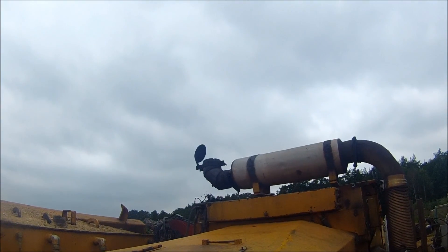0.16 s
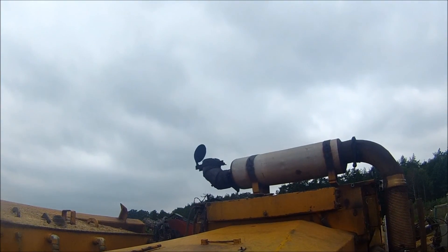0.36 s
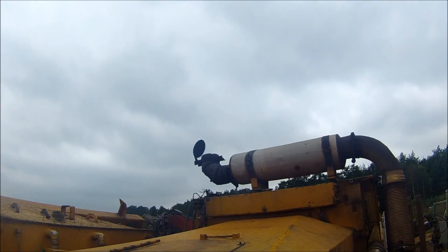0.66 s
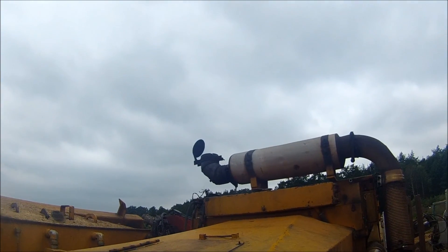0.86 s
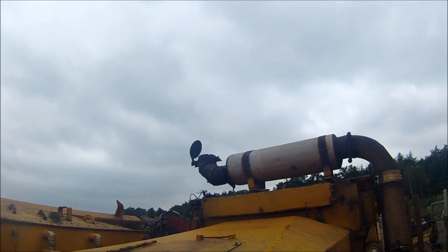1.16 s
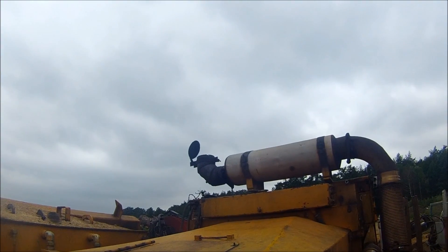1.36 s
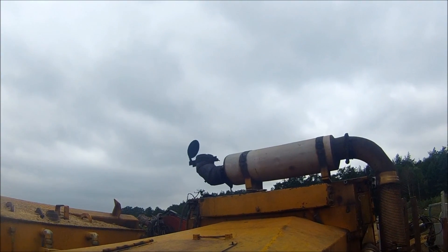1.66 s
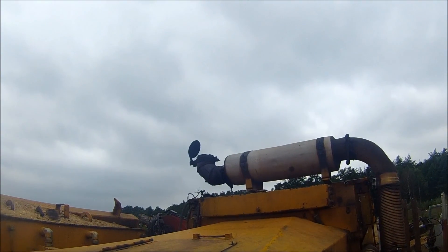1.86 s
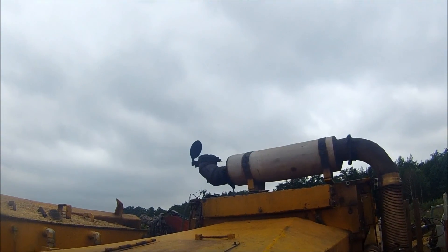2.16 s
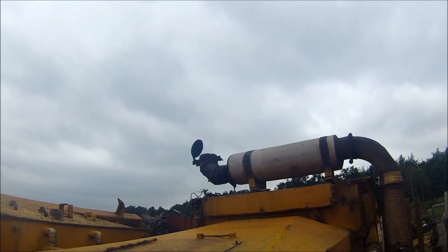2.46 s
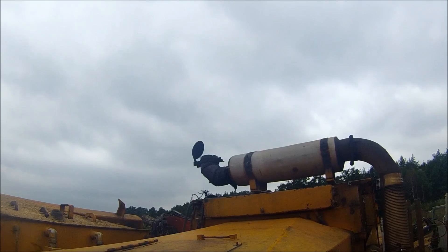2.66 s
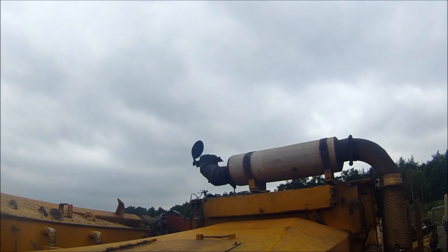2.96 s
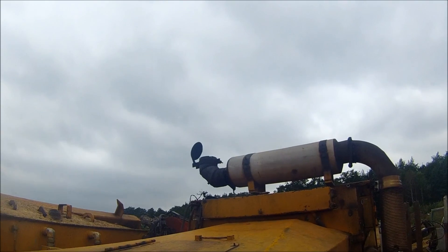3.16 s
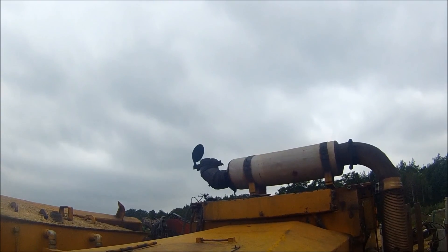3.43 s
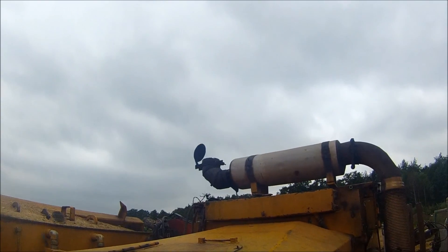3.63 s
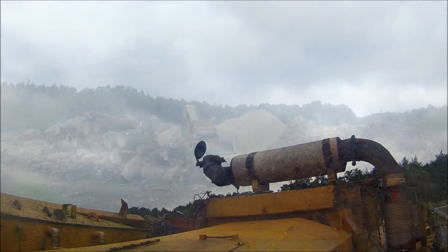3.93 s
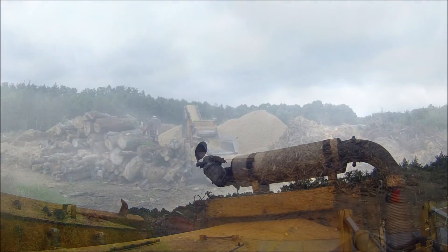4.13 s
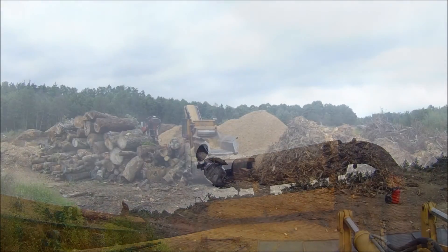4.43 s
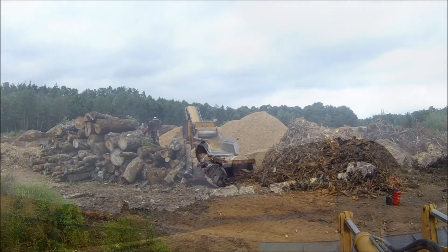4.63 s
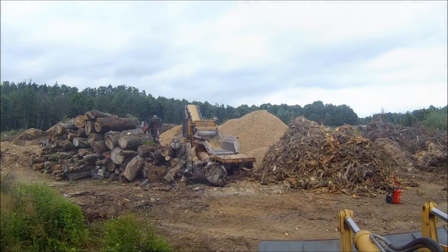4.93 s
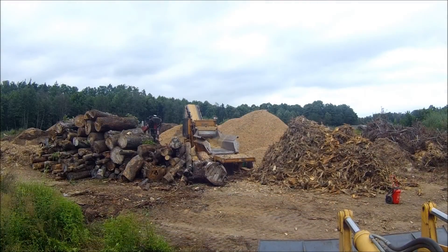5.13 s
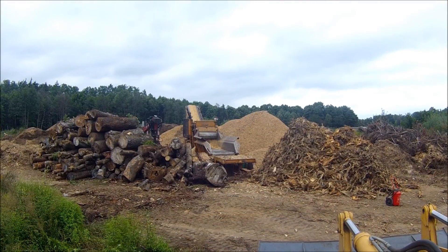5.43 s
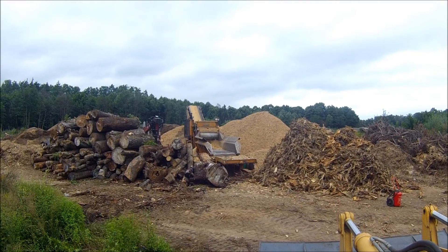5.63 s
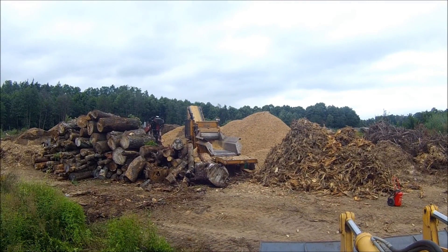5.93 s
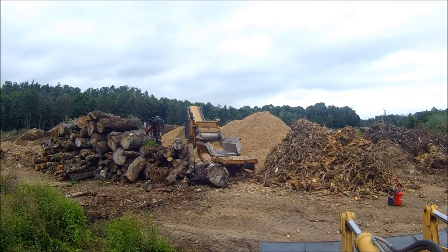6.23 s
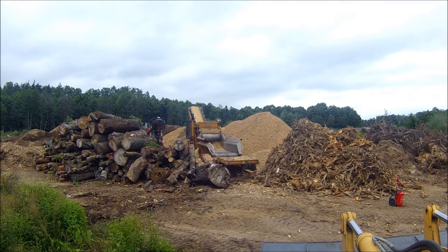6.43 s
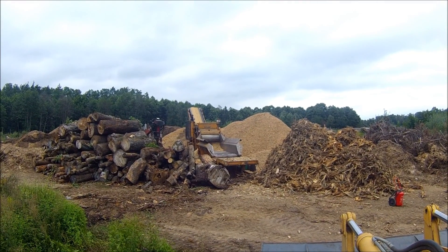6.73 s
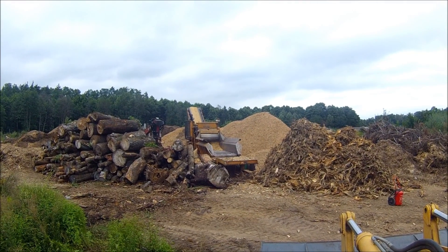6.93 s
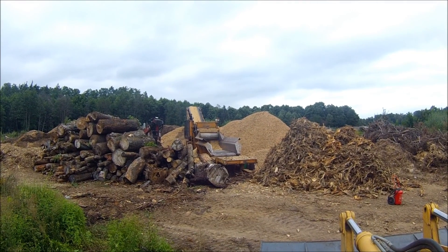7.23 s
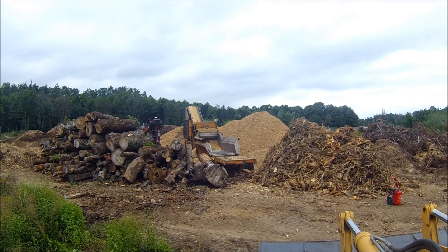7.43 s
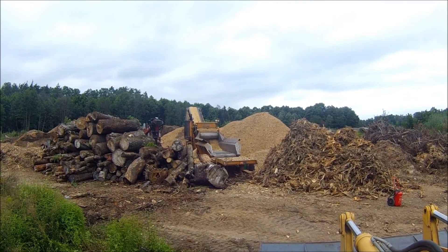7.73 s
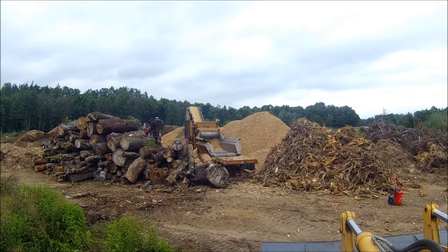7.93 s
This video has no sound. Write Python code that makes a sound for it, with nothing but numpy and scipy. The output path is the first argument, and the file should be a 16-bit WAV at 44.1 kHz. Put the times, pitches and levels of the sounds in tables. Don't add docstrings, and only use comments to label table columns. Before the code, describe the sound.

Up close, a big diesel roars boxily; after a thud it drops away to a far-off grinder sagging under load, with chip rattle and sharp rapid knocks.

```python
import sys
import numpy as np
from scipy import signal
from scipy.io import wavfile
from scipy.ndimage import uniform_filter1d

SR = 44100
rng = np.random.default_rng(int(sys.argv[2]) if len(sys.argv) > 2 else 0)


def boost_factor(decibels):
    exponent = np.asarray(decibels, float) / 20
    return 10 ** exponent


def bounce(signal):
    frames = np.transpose(np.atleast_2d(signal))
    limited = np.clip(frames, -1, 1)
    pcm = np.round(limited * 32767).astype(np.int16)
    wavfile.write(sys.argv[1], SR, pcm)


N = 356769


def seconds():
    return np.arange(N) / SR


def curve(rows):
    times, values = np.transpose(rows)
    return np.interp(seconds(), times, values)


def evened(x):
    return x / np.sqrt(np.mean(x ** 2) + 1e-20)


def wander(rate_hz, step):
    f = np.geomspace(rate_hz / 10, rate_hz, 16)[:, None]
    t = np.arange(0, N + 256, 256) / SR
    sines = np.sin(2 * np.pi * (f * t + rng.random(f.shape))) / np.sqrt(f)
    return np.interp(np.arange(0, N, step) / SR, t, evened(sines.sum(0)))


def drift(rate_hz):
    return wander(rate_hz, step=1)


def band(x, lo_hz, hi_hz):
    return signal.sosfilt(signal.butter(3, [lo_hz, hi_hz], "band", fs=SR, output="sos"), x)


def through(x, air, case, leak_db):
    hz = np.abs(np.fft.fftfreq(8192, 1 / SR)) + 1
    power = boost_factor(leak_db) ** 2
    for centre, width, db in case:
        power = power + boost_factor(db) ** 2 / (1 + (2 * (hz - centre) / width) ** 2) ** 2
    air_hz, air_db = np.transpose(air)
    air_gain = boost_factor(np.interp(np.log(hz), np.log(air_hz), air_db))
    log_gain = np.log(power) / 2 + np.log(air_gain)
    taps = np.fft.ifft(np.exp(np.conj(signal.hilbert(log_gain)))).real[:4096]
    return signal.oaconvolve(x, taps / np.linalg.norm(taps))[:len(x)]


def turbulence(patchy_db, tilt_db):
    frames, hz = N // 128 + 5, np.fft.rfftfreq(512, 1 / SR)
    real, imag, patches = rng.standard_normal((frames, 257, 3)).T
    patches = uniform_filter1d(patches, size=8, axis=0)
    patches = evened(uniform_filter1d(patches, size=20, axis=1))
    tilt = np.interp(np.arange(frames) * 128, np.arange(N), tilt_db)
    slope = np.outer(hz / 6600.0, tilt)
    spectrum = (real + 1j * imag) * boost_factor(patchy_db * patches + slope)
    return evened(signal.istft(spectrum, nperseg=512, noverlap=384)[1][:N])


def orders(turns, table, unsteady_db):
    low = 0
    for multiple, db in table:
        level = boost_factor(db + unsteady_db * wander(5, step=8))
        low = low + level * np.sin(2 * np.pi * (multiple * turns[::8] + rng.random()))
    return np.sqrt(2) * signal.resample_poly(low, 8, 1)[:N]


# (time [s], full firing cycles [Hz])
NEAR_SPEED = [
    (0, 16.25),
    (1.25, 16.3),
    (1.7, 15.9),
    (2.5, 15.9),
    (2.8, 16.1),
    (3.3, 16.0),
    (3.7, 15.65),
    (4.6, 15.5),
    (5.1, 15.3),
]


def near_crank():
    speed_hz = curve(NEAR_SPEED)
    return np.cumsum(speed_hz) / SR, speed_hz


# (time [s], level [dB])
ROAR = [(0, -18), (.6, -16), (1, -17.5), (1.6, -16.5), (2.3, -17.5), (2.7, -16), (3.5, -17.5), (4.1, -16.5),
        (4.6, -18), (5.1, -17.5)]
# (frequency [Hz], level [dB])
ROAR_AIR = [(20, -18), (80, -7), (250, -5), (350, -8.5), (800, -7.5), (1800, -17.5), (5000, -11.5),
            (7000, -23.5), (15000, -36)]
# (frequency [Hz], width [Hz], level [dB])
NEAR_CASE = [(755, 100, -15.5), (904, 47, -7.5), (1024, 85, -6.5), (1134, 182, 0), (1446, 184, 5.5),
             (2175, 168, 10), (2427, 347, 11.5), (2690, 280, 2.5), (3023, 360, 1), (3605, 470, -0.5),
             (4028, 384, 6), (4350, 250, 2), (4617, 307, 4.5), (4920, 160, -3), (5250, 380, -8),
             (5910, 270, -10.5), (6570, 210, -6), (6790, 170, -5.5), (8080, 1020, -5), (9400, 620, -9),
             (10360, 940, -12), (12600, 900, -10)]


def exhaust_roar(cycle):
    effort_db = curve(ROAR)
    gate_db = 0.2 * np.sin(cycle) + 0.47 * np.sin(2 * cycle + 1) + 0.5 * np.sin(3 * cycle + 2)
    gate_db = gate_db + 0.52 * drift(60)
    tilt_db = 0.59 * (-16.5 - effort_db)
    gusts = turbulence(patchy_db=0.35, tilt_db=tilt_db) * boost_factor(gate_db)
    return evened(through(gusts, ROAR_AIR, NEAR_CASE, leak_db=-13.5)) * boost_factor(effort_db - 0.08)


# (multiple of the cycle [1], level [dB rms])
NEAR_ORDERS = [(1, -56), (2, -48), (2.5, -53), (3, -45), (4, -45), (5, -52), (6, -44), (7, -54), (8, -43),
               (9, -44), (10, -42), (11, -52), (12, -47), (12.5, -54), (13, -45), (13.5, -51), (14, -41),
               (14.5, -55), (15, -44), (16, -48), (17, -53), (18, -56), (19, -54), (21, -53)]


def crank_orders(turns):
    return boost_factor(1) * orders(turns, NEAR_ORDERS, unsteady_db=1.3)


# (multiple of the cycle [1], level [dB rms])
GEAR_ORDERS = [(33, -58), (36, -51), (39, -53), (42, -56), (45, -52), (48, -48), (54, -52), (55, -51),
               (56, -48), (57, -50), (70, -49), (90, -46)]


def gear_orders(turns):
    return boost_factor(-1) * orders(turns, GEAR_ORDERS, unsteady_db=2.5)


# (time [s], level [dB])
TURBO = [(0, -44.5), (.5, -38.5), (1, -45.5), (1.9, -54), (2.2, -45), (2.5, -43), (2.8, -39), (3.55, -51),
         (3.72, -41), (4.7, -43), (5.1, -43)]


def turbocharger(cycle, speed_hz):
    sag_hz = 16.3 - speed_hz
    whistle_hz = 7930 - 72 * sag_hz + 14 * np.sin(cycle) + 5 * drift(12)
    spin = 2 * np.pi * np.cumsum(whistle_hz) / SR
    lower = np.sin(spin) * boost_factor(6.5 * np.sin(cycle + 1.6) + 2 * drift(30))
    upper = np.sin(spin + 3.5 * cycle) * boost_factor(5.5 * np.sin(cycle - 0.9) + 2.5 * drift(30))
    whistles = evened(lower) * boost_factor(curve(TURBO)) + evened(upper) * boost_factor(-43.5)
    intake_db = -66.5 + 23.5 * sag_hz + 4 * np.sin(cycle) + 2.5 * drift(30)
    return whistles + np.sin(spin * 5 / 6) * boost_factor(intake_db)


# (time [s], step [dB])
DUCKS = [(.27, -4.5), (1.0, -2.5), (1.14, -2.5), (1.57, -2), (1.9, -1), (2.055, -3), (2.41, -3.5),
         (2.75, -1.5), (2.93, -2), (3.19, -1.5), (3.52, -2), (4.0, -2.5), (4.41, -2)]


def ducking():
    t = seconds()
    gain_db = np.zeros(N)
    for start, step_db in DUCKS:
        attack = np.clip((t - start) / 0.011, 0, 1)
        gain_db += step_db * np.exp(-np.maximum(t - start, 0) / 0.12) * attack
    return boost_factor(gain_db)


def near_camera():
    turns, speed_hz = near_crank()
    cycle = 2 * np.pi * turns
    engine = exhaust_roar(cycle) + crank_orders(turns) + gear_orders(turns)
    hiss = boost_factor(-52) * rng.standard_normal(N)
    return (engine + turbocharger(cycle, speed_hz) + hiss) * ducking()


# (time [s], firing rate [Hz])
FAR_SPEED = [
    (3.75, 94.6),
    (4.15, 95),
    (4.6, 99),
    (5.35, 102),
    (5.85, 95),
    (6.4, 87),
    (6.9, 84.2),
    (7.25, 87.4),
    (7.87, 98.9),
    (8.09, 102),
]
# (sixths of firing [1], level [dB rms])
FAR_ORDERS = [(1, -52), (2, -46), (3, -48), (4, -47), (5, -52), (7, -55), (7.5, -55), (8, -55), (9, -55),
              (10, -54), (12, -50), (13, -60), (14, -51), (15, -55), (16, -59), (20, -58), (22, -59),
              (24, -59), (25, -57), (26, -57)]


def far_drone():
    firing_hz = curve(FAR_SPEED)
    turns = np.cumsum(firing_hz) / (6 * SR)
    firing_gain = boost_factor(-37 + 0.27 * (102 - firing_hz))
    firing = firing_gain * orders(turns, [(6, 0)], unsteady_db=0.8)
    side_gain = boost_factor(0.3 * (firing_hz - 93))
    return firing + side_gain * orders(turns, FAR_ORDERS, unsteady_db=1.5)


# (frequency [Hz], level [dB])
GRIND_AIR = [(20, 9), (60, 5), (130, -6.5), (260, -0.5), (380, 1), (450, -5), (600, -10), (1800, -20.5),
             (4500, -16), (6000, -29), (9000, -32.5)]
# (frequency [Hz], width [Hz], level [dB])
FAR_CASE = [(958, 120, -6), (1141, 146, 1), (1443, 200, 7.5), (1980, 200, -6.5), (2218, 177, 10.5),
            (2474, 255, 9), (2664, 160, 6), (2975, 130, 2.5), (3780, 180, -10), (4100, 450, 0.5),
            (4430, 300, 6), (4700, 180, 4), (5010, 120, -9), (5220, 260, -2.5), (5570, 160, -6),
            (6100, 300, -5.5), (6670, 160, -5), (7950, 130, -7), (8250, 200, -5.5)]


def through_far_case(x, leak_db):
    return through(x, GRIND_AIR, FAR_CASE, leak_db)


# (time [s], level [dB])
GRIND = [(5.2, -1.5), (5.6, 2), (5.85, 1.5), (6.23, 0), (6.64, 0.5), (7.09, -2.5), (7.55, -2), (7.72, -1),
         (7.85, -0.5), (8.08, -1)]


def grinding():
    bite_db = curve(GRIND)
    wash = turbulence(patchy_db=0.7, tilt_db=np.zeros(N)) * boost_factor(-31.5 + bite_db)
    grain_gain = boost_factor(0.93 * np.minimum(rng.exponential(1, N), 5))
    struck = rng.random(N) < 2500 / SR
    grains = grain_gain * struck * rng.choice([-1, 1], N)
    rattle_gain = boost_factor(-30 + 2.1 * bite_db + 1.6 * drift(25))
    rattle = band(evened(grains), 3600, 9000) * rattle_gain
    return through_far_case(wash + rattle, leak_db=-13)


# (frequency [Hz], level [dB])
WHINES = [(6810, -73), (7300, -86), (8242, -82), (10557, -74), (11407, -70), (11579, -81), (12430, -91),
          (13625, -90), (15154, -93)]


def far_electronics():
    t = seconds()
    whines = sum(boost_factor(db + 1) * np.sin(2 * np.pi * hz * t) for hz, db in WHINES)
    return whines + boost_factor(-50.5) * rng.standard_normal(N)


def bump():
    t = seconds()

    def pulse(centre_s, width_s):
        return np.exp(-((t - centre_s) / width_s) ** 2)

    push = -0.22 * pulse(5.1135, 0.0035) - 0.15 * pulse(5.099, 0.007) + 0.05 * pulse(5.121, 0.003)
    tick = boost_factor(-19) * pulse(5.104, 0.0005) * rng.choice([-1.0, 1.0], N)
    scuff = boost_factor(-34) * pulse(5.098, 0.004) * rng.standard_normal(N)
    return push + band(tick + scuff, 4500, 15000)


# (time [s], ping peak [dB], bright snap [dB])
KNOCKS = [(5.224, -24, -34), (5.4025, -28, -32), (5.4899, -22, -32), (5.5994, -26, -32), (5.686, -18, -28),
          (5.7994, -25, -30), (5.885, -20, -26), (5.9873, -19, -29), (6.0911, -30, -31), (6.1958, -13, -29),
          (6.3025, -15, -27), (6.4093, -7.5, -23), (6.5181, -12, -22), (6.6272, -12, -23),
          (6.7392, -15.5, -18), (6.8532, -22, -26), (6.969, -32, -24)]


def knocks():
    out, t = np.zeros(N + 8000), np.arange(5000) / SR
    since_peak = t - 0.0018
    burst = np.exp(-(since_peak / 0.0009) ** 2)
    first_s = KNOCKS[0][0]
    for start, ping_db, snap_db in KNOCKS:
        snap, spray = rng.standard_normal((2, len(t)))
        ping_hz = 4460 + 55 * rng.standard_normal()
        ping = boost_factor(ping_db) * burst * np.sin(2 * np.pi * (ping_hz * t + 9e4 * since_peak ** 2))
        snap = band(snap * burst, 5250, 8700)
        snap = boost_factor(snap_db + 10) * snap / np.abs(snap).max()
        spray_db = -22.5 + 1.5 * (start - first_s) - 60 * t / 0.077
        spray = band(spray, 3160, 10500) * boost_factor(spray_db) * np.clip(t / 0.0039, 0, 1)
        out[round(start * SR):][:len(t)] += ping + through_far_case(snap + spray, leak_db=-16)
    return out[:N]


def far_camera():
    return far_drone() + grinding() + knocks() + far_electronics()


def scene():
    t = seconds()
    near = near_camera() * np.clip((5.119 - t) / 0.014, 0, 1)
    far = far_camera() * np.clip((t - 3.74) / 0.019, 0, 1)
    return (near + far + bump())[None]


def roll_off(x):
    return signal.sosfilt(signal.butter(12, 15560, fs=SR, output="sos"), x)


def record(dry):
    edge = signal.firwin(2047, 15290, window=("kaiser", 9), fs=SR)
    mix = signal.oaconvolve(dry, edge[None], "same")
    return roll_off(mix)


dry = scene()
out = record(dry)
bounce(out)
```